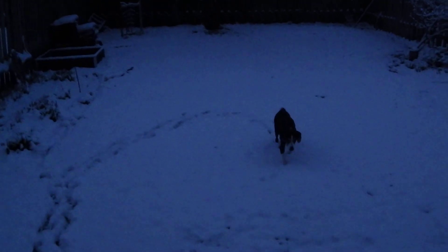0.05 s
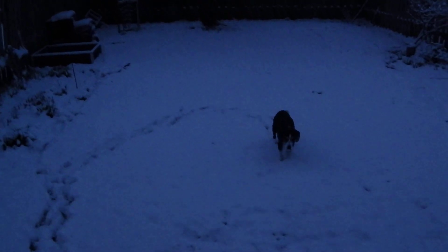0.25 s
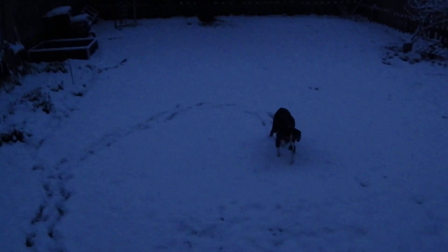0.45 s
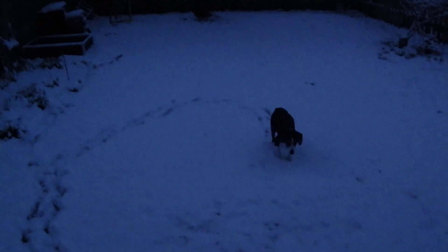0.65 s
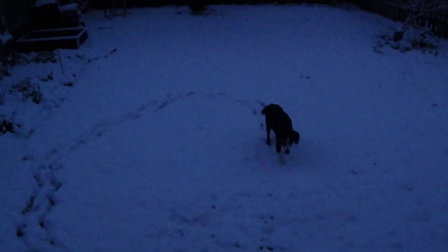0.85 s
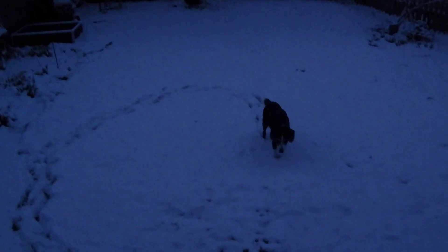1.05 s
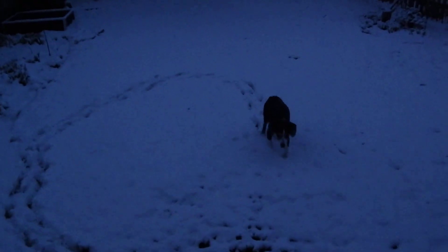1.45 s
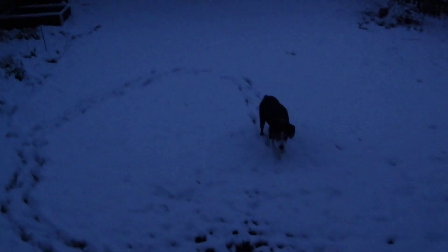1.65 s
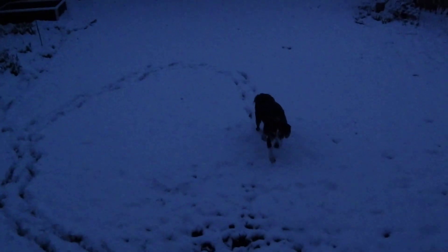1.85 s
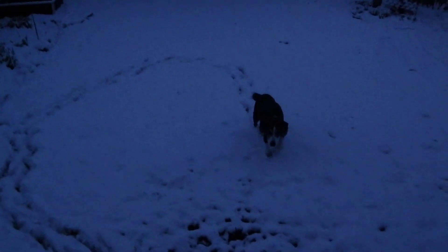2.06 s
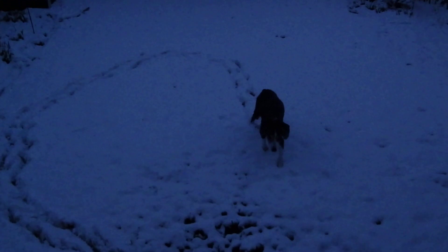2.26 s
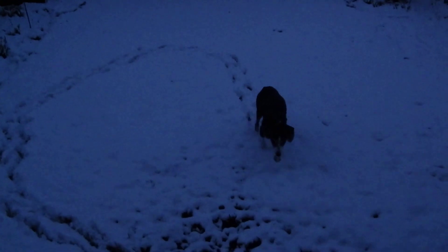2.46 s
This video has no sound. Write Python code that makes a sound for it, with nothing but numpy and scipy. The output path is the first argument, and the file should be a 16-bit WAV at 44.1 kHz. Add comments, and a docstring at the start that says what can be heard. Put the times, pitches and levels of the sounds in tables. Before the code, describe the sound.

A songbird sings four short, high warbled phrases with brief pauses, each echoing faintly across a snowy yard. Behind it run a quiet distant town rumble, a low machine hum and a soft hiss.

```python
"""A songbird sings four short warbled phrases above a snowy yard. The two sides of its syrinx
take turns and sometimes overlap, each a nearly pure whistle; houses and fences return a faint echo.
Behind it lie a far bird's whistle, a few tiny ticks, a low machine hum, a distant town rumble
and a soft hiss."""
import sys
import numpy as np
from scipy import signal
from scipy.fft import rfft, irfft, next_fast_len
from scipy.io import wavfile
from scipy.ndimage import map_coordinates

SR = 44100
rng = np.random.default_rng(int(sys.argv[2]) if len(sys.argv) > 2 else 0)


def master(y):
    """Save y as 16-bit WAV."""
    cut = np.clip(np.atleast_2d(y).T, -1, 1)
    pcm = np.round(cut * 32767)  # scale
    wavfile.write(sys.argv[1], SR, pcm.astype(np.int16))


N = 114660
T = np.arange(N) / SR


# Notes of the lower and upper voice.
# Each row: octave overtone in dB, curve of (time in seconds, pitch in Hz, level in dB).
LOW_NOTES = [ (-29, [(.281, 2470, -26), (.294, 2416, -27), (.303, 2290, -30)]), (-33, [(.300, 2570, -32),
             (.303, 2840, -34), (.308, 2836, -20), (.329, 2827, -21.5), (.340, 2882, -21.5),
             (.353, 2846, -22), (.360, 2750, -23)]), (-33.5, [(.360, 2560, -38), (.370, 2357, -27.5),
             (.378, 2130, -36), (.386, 2408, -24), (.402, 2466, -20.5), (.413, 2370, -28.5)]),
             (-39, [(.763, 2394, -46), (.773, 2424, -35.5), (.801, 2464, -25.5), (.843, 2511, -23.5),
             (.868, 2438, -24.5), (.880, 2436, -23.5), (.889, 2288, -28.5), (.915, 2133, -29),
             (.924, 1980, -42)]), (-34, [(.927, 2630, -35), (.933, 3078, -32.5), (.945, 2578, -25),
             (.953, 2244, -30), (.959, 2976, -26), (.971, 2347, -27), (.982, 2209, -27.5),
             (1.002, 2174, -29), (1.024, 2020, -43)]), (-29, [(1.320, 2790, -32.5), (1.333, 2812, -30),
             (1.343, 2760, -29), (1.349, 3025, -39), (1.355, 3210, -19), (1.364, 2970, -48)]),
             (-32, [(1.385, 2830, -31), (1.393, 2927, -30.5), (1.405, 2890, -31), (1.417, 2374, -40.5),
             (1.427, 2900, -27), (1.441, 2810, -29.5), (1.460, 2870, -29.5), (1.481, 2970, -35.5),
             (1.497, 2840, -37)]), (-26, [(2.186, 2220, -40), (2.190, 2940, -31), (2.196, 2798, -26),
             (2.210, 2738, -26), (2.220, 2524, -27.5), (2.228, 2040, -39)]), (-26, [(2.251, 2300, -34),
             (2.257, 3003, -24.5), (2.263, 2840, -24.5), (2.278, 2600, -24), (2.293, 2060, -35)]),
             (-30, [(2.292, 2805, -37), (2.300, 2654, -33), (2.314, 2600, -40), (2.335, 2750, -43),
             (2.353, 2840, -43)]), (-25, [(2.348, 1910, -46), (2.368, 1940, -48), (2.388, 1760, -55)]),
             (-32, [(2.398, 2640, -31), (2.404, 2550, -33.5), (2.413, 2100, -42)]), ]
HIGH_NOTES = [ (-26, [(.206, 3800, -54), (.215, 3520, -54), (.220, 3400, -34), (.229, 3320, -31),
              (.259, 3160, -24), (.266, 3056, -21), (.273, 2270, -30.5), (.280, 2220, -52)]),
              (-41.5, [(.272, 3250, -29), (.279, 3100, -26.5), (.284, 2770, -29)]),
              (-28, [(.408, 3070, -33), (.416, 3030, -34.5), (.426, 2520, -31)]), (-32, [(1.309, 3260, -40),
              (1.321, 3700, -38), (1.328, 3280, -33)]), (-32, [(1.335, 3500, -31), (1.345, 3210, -25.5),
              (1.350, 3386, -32), (1.355, 3300, -29.5), (1.365, 3433, -23), (1.374, 3390, -21.5),
              (1.383, 3550, -35)]), (-40, [(1.383, 6950, -44), (1.391, 6850, -46)]),
              (-33, [(1.415, 3440, -47), (1.420, 3460, -30.5), (1.427, 3200, -33)]),
              (-35, [(1.436, 4730, -52), (1.440, 5780, -47), (1.446, 6200, -47.5), (1.458, 4750, -52),
              (1.470, 6200, -55), (1.480, 6850, -63), (1.505, 6880, -65)]), (-35, [(1.497, 4350, -50),
              (1.507, 4720, -49), (1.522, 4850, -55)]), (-42, [(2.226, 3790, -39.5), (2.241, 3806, -31),
              (2.252, 3630, -31.5), (2.260, 3300, -32)]), (-34, [(2.349, 3570, -43), (2.355, 3860, -40),
              (2.380, 3796, -40), (2.390, 3250, -43)]), ]

def songbird():
    """The two sides of the syrinx whistle independently."""
    return whistle(LOW_NOTES) + whistle(HIGH_NOTES)


def whistle(notes, edge_s=0.0021, octave_db_per_db=0.18):
    """One side of a syrinx: a gliding tone whose weak octave grows with loudness."""
    out = np.zeros(N)
    waver = 1 + 0.0024 * wobble(rate_hz=250)
    flutter_db = -0.2 * wobble(rate_hz=250)
    octave_flutter_db = 3.5 * wobble(rate_hz=130)
    for overtone_db, curve in notes:
        times_s, hz, db = np.transpose(curve)
        on = (T > times_s[0]) & (T < times_s[-1])
        t = T[on]
        phase = 2 * np.pi * np.cumsum(np.interp(t, times_s, hz) * waver[on]) / SR
        to_edge_s = np.minimum(t - times_s[0], times_s[-1] - t)
        gate = np.sin(np.pi / 2 * np.clip(to_edge_s / edge_s, 0, 1)) ** 2
        level_db = np.interp(t, times_s, db) + flutter_db[on]
        octave_db = overtone_db + octave_db_per_db * (level_db - db.max()) + octave_flutter_db[on]
        tone = np.sin(phase) + amp(octave_db) * np.sin(2 * phase)
        out[on] += np.sqrt(2) * gate * amp(level_db) * tone
    return out


# Song phrases. Each row: start in seconds, echo gain in dB.
PHRASES = [(0, -2.5), (.7, 1), (1.25, -3.5), (2.1, -1)]

def echoes(birds, shimmer_rad=0.52):
    """Each phrase carries into the yard differently; moving air makes the echo shimmer."""
    ends_s = [start_s for start_s, _ in PHRASES[1:]] + [np.inf]
    echo = np.zeros(N)
    for (start_s, db), end_s in zip(PHRASES, ends_s):
        echo += amp(db) * yard(birds * (T >= start_s) * (T < end_s))
    phase_shift = shimmer_rad * wobble(rate_hz=110)
    return np.real(signal.hilbert(echo) * np.exp(1j * phase_shift))


# Wall reflections. Each row: delay in seconds, relative level in dB.
WALLS = [(0.035, -21.5), (.072, -19.5), (.128, -24), (0.23, -33)]

def yard(x, tail_db=-15.5, t60_s=0.82, rise_s=0.0036, smear_s=0.0068):
    """A diffuse outdoor tail plus wall reflections, smeared by fences and twigs."""
    t = T[:SR]
    tail = rng.standard_normal(SR) * amp(-60 * t / t60_s) * (1 - np.exp(-t / rise_s))
    response = amp(tail_db) * tail / np.linalg.norm(tail)
    for delay_s, db in WALLS:
        burst = rng.standard_normal(SR) * (t > delay_s) * np.exp(-np.abs(t - delay_s) / smear_s)
        response += amp(db) * burst / np.linalg.norm(burst)
    return signal.fftconvolve(x, response)[:N]


# Far notes. Each row: octave overtone in dB, curve of (time in seconds, pitch in Hz, level in dB).
FAR_NOTES = [(-40, [(2.262, 4100, -55), (2.315, 4030, -59), (2.342, 3960, -46), (2.365, 4000, -63)]),
             (-43, [(2.412, 3920, -55), (2.432, 3950, -48.5), (2.455, 3850, -63), (2.475, 3870, -61),
             (2.52, 3865, -47.5), (2.56, 3810, -50.5), (2.585, 3850, -53)])]

def far_bird():
    """Two thin, slowly sinking whistles."""
    return whistle(FAR_NOTES)


# Tick spectrum. Each row: frequency in Hz, relative level in dB.
TICK_COLOUR = [(2000, -5), (4500, 0), (7500, 0), (9500, -10), (12000, -26)]
# Ticks. Each row: start in seconds, level in dB.
TICKS = [(.093, -48), (.6924, -38), (0.7043, -38.5)]

def ticks(t60_s=0.013):
    """Tiny dry ticks: fast-decaying bursts of bright noise."""
    envelope = sum(amp(db - 60 * np.abs(T - start_s) / t60_s) * (T > start_s) for start_s, db in TICKS)
    return envelope * noise(TICK_COLOUR)


# Faint upper bands of the hum. Each row: centre in Hz, width in Hz, level in dB.
HUM_BANDS = [(233, 4.9, -64.5), (337, 21, -62), (620, 3.5, -65), (940, 11, -68.5), (1176, 6, -63.5),
             (1245, 8.4, -66)]
# Strong hum tones. Each row: frequency in Hz, level in dB.
HUM_TONES = [(116, -54), (176, -54)]

def machine_hum(drift=0.02015, swell_db=5):
    """A distant machine: two tones wandering in pitch and level, below narrow noise bands."""
    hum = sum(amp(db) * band(hz, width_hz) for hz, width_hz, db in HUM_BANDS)
    for centre_hz, db in HUM_TONES:
        hz = centre_hz * (1 + drift * wobble(rate_hz=7))
        swell = amp(swell_db * np.tanh(wobble(rate_hz=6.36)))
        hum += amp(db) * unit(swell * np.sin(2 * np.pi * np.cumsum(hz) / SR))
    return hum


# Throb envelope. Each row: time in seconds, level in dB.
THROB_LEVELS = [(1.35, -70), (1.5, -54), (2.2, -50.5), (2.6, -54)]

def throb():
    """The deepest band of the machine hum, joining halfway."""
    return amp(np.interp(T, *np.transpose(THROB_LEVELS))) * band(centre_hz=57, width_hz=27)


# Rumble and hiss spectrum. Each row: frequency in Hz, relative density in dB.
AIR_COLOUR = [(15, -51), (25, -7), (150, -4), (215, -3), (297, -8), (457, -9.5), (567, -10), (750, -10),
              (850, -8), (1020, -10), (1410, -14.5), (1800, -16.5), (2170, -11), (2630, -16), (2850, -17),
              (3170, -17), (3440, -17), (4750, -22.5), (5580, -21.5), (8130, -31.5), (14300, -36),
              (15500, -37)]
# Narrow hiss bands. Each row: centre in Hz, width in Hz, level in dB.
HISS_BANDS = [(2205, 120, -52), (2350, 57, -63), (5490, 57, -64.5), (4445, 150, -66), (6680, 680, -64.5)]

def rumble_and_hiss(level_db=-43, fade_db_per_s=0.87):
    """Town rumble and soft hiss: broad noise easing off slowly under steady narrow bands."""
    broad = amp(level_db - fade_db_per_s * (T - T.mean())) * noise(AIR_COLOUR)
    return broad + sum(amp(db) * band(hz, width_hz) for hz, width_hz, db in HISS_BANDS)


def amp(db):
    """Decibels to gain."""
    return 10 ** (np.asarray(db) / 20)


def unit(x):
    """Scale to rms 1."""
    return x / np.sqrt(np.mean(x ** 2) + 1e-20)


def wobble(rate_hz):
    """Smooth random curve, rate_hz knots a second."""
    return map_coordinates(rng.standard_normal(int(N * rate_hz / SR) + 4), [T * rate_hz])


def filtered(x, response):
    """Apply a gain given as a function of frequency in Hz."""
    size = next_fast_len(N + SR // 2)
    return irfft(rfft(x, size) * response(np.fft.rfftfreq(size, 1 / SR)), size)[:N]


def noise(colour):
    """Noise of rms 1 shaped by (Hz, dB) points."""
    knots_hz, db = np.transpose(colour)
    white = rng.standard_normal(N)
    return unit(filtered(white, lambda hz: amp(np.interp(np.log(hz + 1), np.log(knots_hz + 1), db))))


def band(centre_hz, width_hz):
    """Narrow noise of rms 1."""
    white = rng.standard_normal(N)
    return unit(filtered(white, lambda hz: 1 / np.sqrt(1 + (2 * (hz - centre_hz) / width_hz) ** 4)))


def scene():
    """The birds and their echo over the background, in mono."""
    background = rumble_and_hiss() + machine_hum() + throb() + ticks()
    birds = songbird() + far_bird()
    return (birds + echoes(birds) + background)[None]


def record(dry):
    """Brick-wall low-pass at 15.7 kHz."""
    return filtered(dry[0], lambda hz: hz < 15700)[None]


dry = scene()
out = record(dry)
master(out)
```